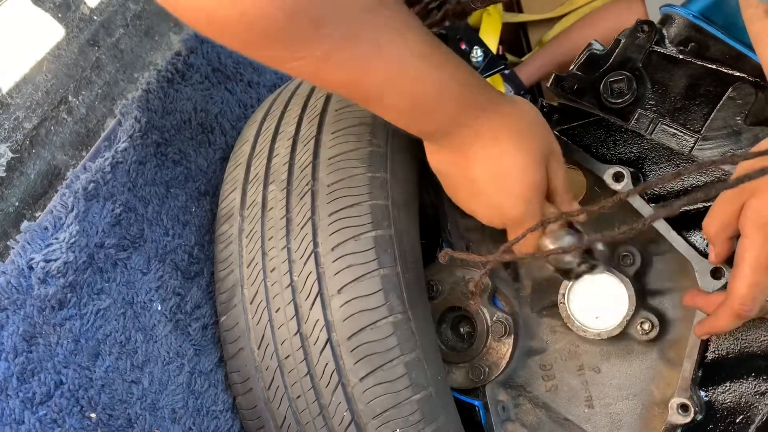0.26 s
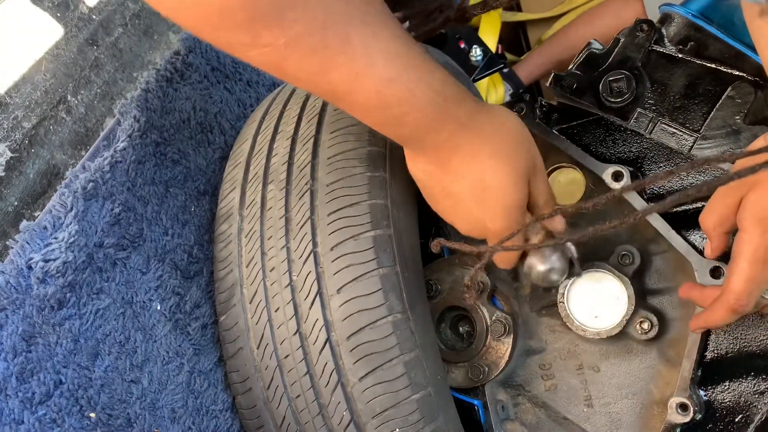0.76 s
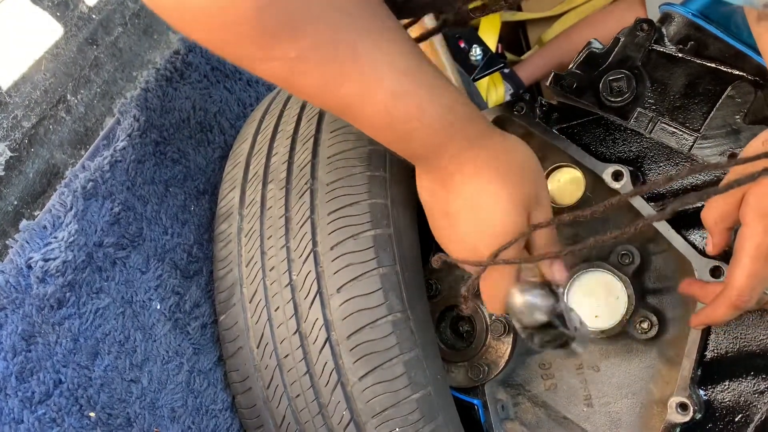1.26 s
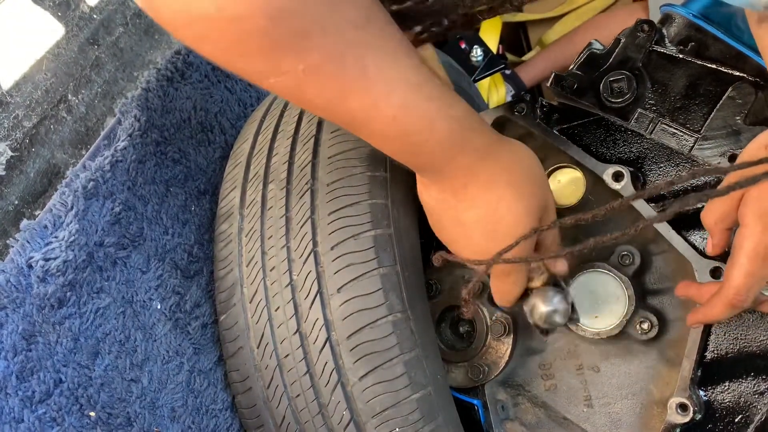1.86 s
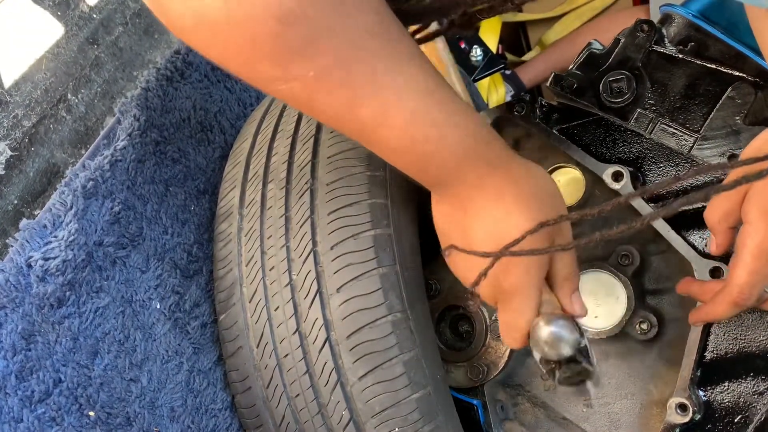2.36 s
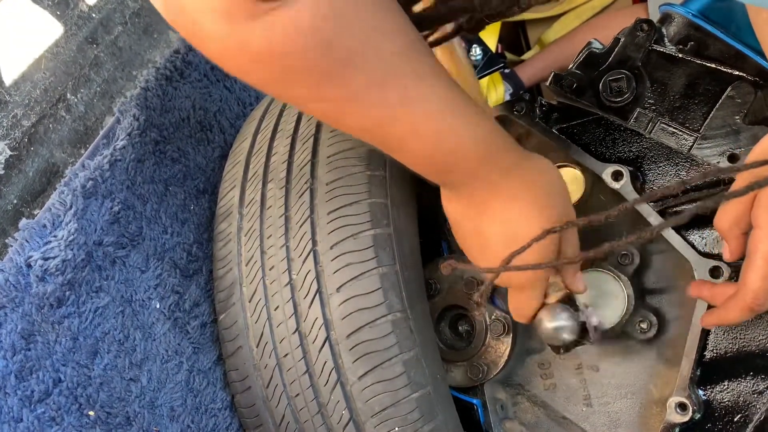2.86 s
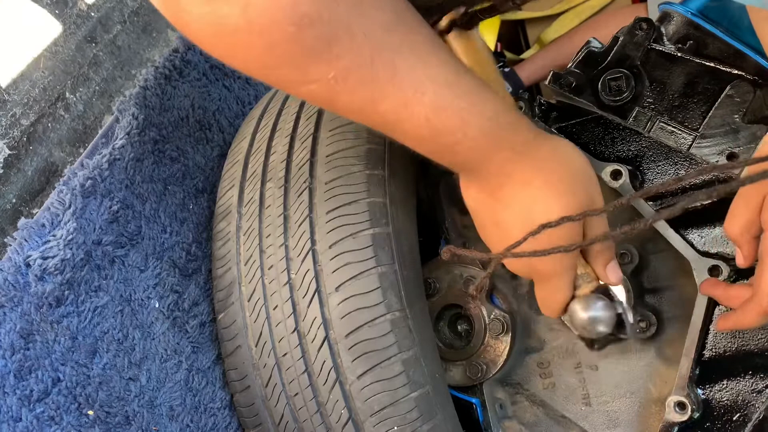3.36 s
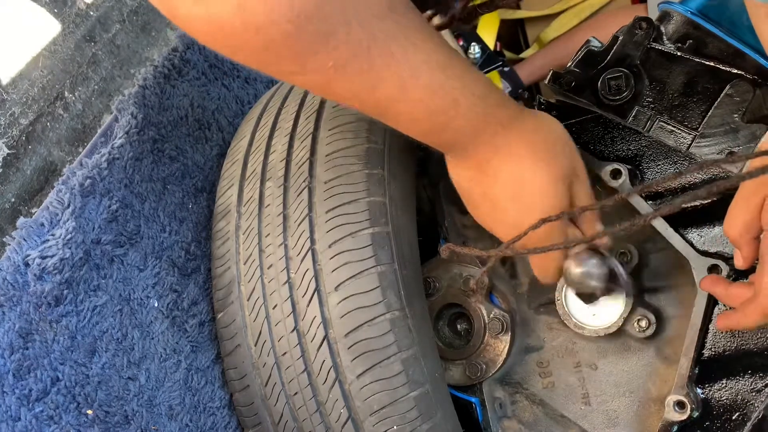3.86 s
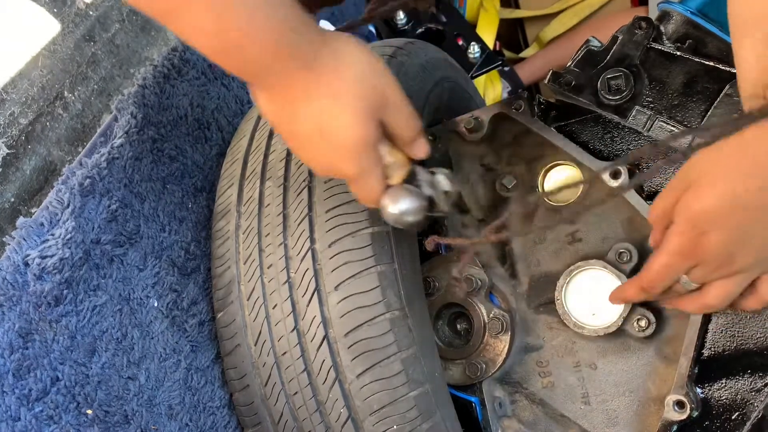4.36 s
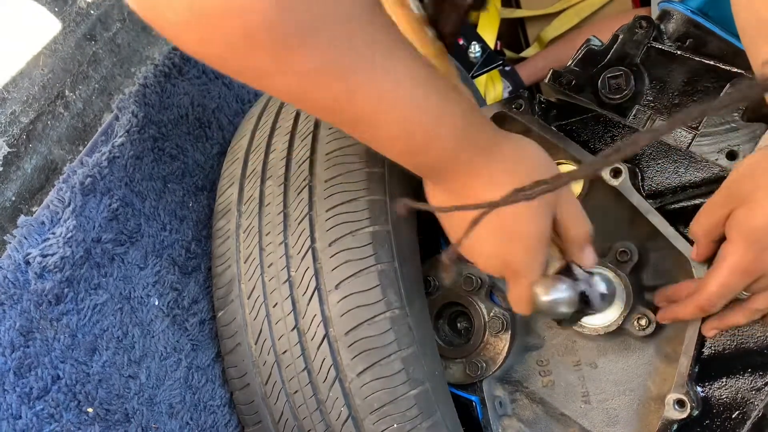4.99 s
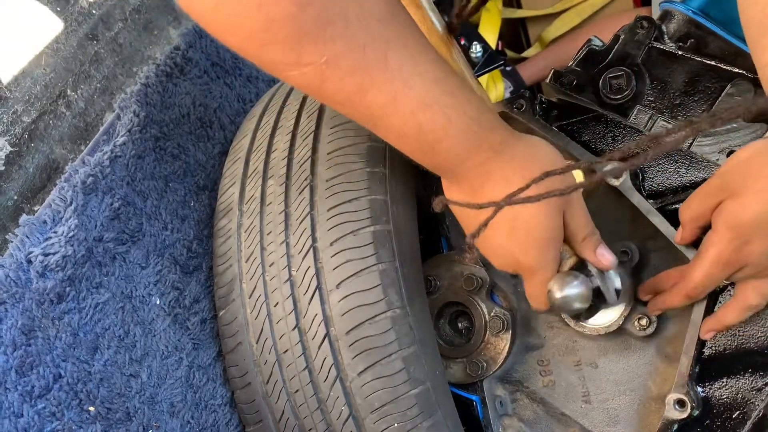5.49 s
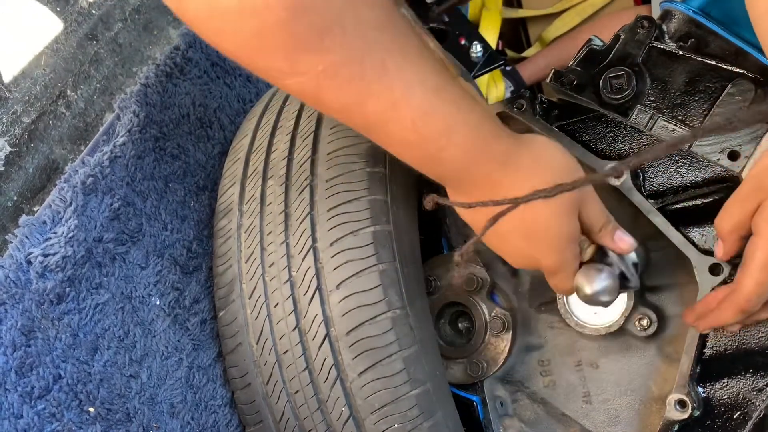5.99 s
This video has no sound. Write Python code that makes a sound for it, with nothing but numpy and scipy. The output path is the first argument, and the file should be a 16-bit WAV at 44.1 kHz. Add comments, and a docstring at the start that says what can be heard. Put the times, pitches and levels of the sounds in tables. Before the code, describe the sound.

Close outdoor sound of a small steel hammer driving a metal plug into a cast gearbox housing. Eleven loud, evenly spaced blows, nearly three a second, each a hard crack with a short, dull metallic clank and a slight ping. They stop before four seconds; after a gap come two very faint aiming taps, then one last hard blow. Low, quiet outdoor rumble and a faint yard tail.

```python
"""A small steel hammer taps a metal plug into a cast gearbox housing that rests against a tyre, outdoors.
A run of even blows, two light aiming taps and one last blow: damped modes make the plug's knock, the
housing's clank and the hammer head's ping; decaying bands of noise make the crack and the yard's faint tail.
Soft bumps, scuffs and ticks are heard besides the blows, over a low outdoor rumble of shaped noise.
Two microphone channels, alike in the bass and apart in the treble; a limiter holds down the peaks."""
import sys
import numpy as np
from scipy import signal
from scipy.fft import irfft
from scipy.io import wavfile
from scipy.ndimage import uniform_filter1d, minimum_filter1d

SR = 44100
rng = np.random.default_rng(int(sys.argv[2]) if len(sys.argv) > 2 else 0)


def to_wav(sig):
    """Store sig (one row per channel, or 1-D mono) as 16-bit WAV at the path in sys.argv[1].

    Samples outside -1..1 are clipped; the rate is SR.
    """
    pcm = np.clip(np.atleast_2d(sig), -1, 1) * 32767
    pcm = np.round(pcm).astype(np.int16)
    wavfile.write(sys.argv[1], SR, pcm.T)  # frames by channels


N = 274743  # length in samples
AGE = np.arange(SR) / SR  # time since a sound began, s

# Hammer blows: start_s, force_db, contact_brightness_db, top_head_ping_db
BLOWS = [(-0.2, 2, 0, 0), (0.1725, -0.7, 6, 4), (0.5478, 1.2, 2, -1), (0.9299, 0.3, 2.5, 1),
         (1.3091, -0.2, 0.5, 0), (1.684, 2.2, -4, 2), (2.0468, 3.5, -3.5, 2), (2.4085, 1.8, -1.5, 2),
         (2.7592, 1.6, -3.5, -3), (3.1166, -0.3, 3.3, 2), (3.4643, 0.2, 2.8, 8), (3.8122, 0, 3.5, 4),
         (5.0605, -24.5, -7, 4), (5.2389, -23, -19, -27), (5.7733, 0.2, -2.5, -14)]
# The plug's brief, heavily damped shudder as it is driven in: pitch_hz, level_db, length_s, channel_phase_rad
PLUG_SHUDDER = [(585, -6, .007, .55), (2130, -12, .007, 1.45), (5900, -19, .007, 1.4),
                (10300, -19, .003, 1.2)]
# Low modes of the wall around the plug: pitch_hz, level_db, t60_s, channel_phase_rad
WALL_MODES = [(143, -31, .13, .3), (210, -31, .07, .3), (291, -23, .06, .4), (520, -24, .04, .5),
              (668, -17, .065, .6), (960, -23, .055, 1.3), (1105, -26, .08, 1.5)]
# Damped modes of the housing near the plug: pitch_hz, level_db, t60_s, channel_phase_rad
HOUSING_MODES = [(1110, -27, .065, 1.2), (1420, -29, .1, 1.4), (1660, -31, .09, 1.4), (1755, -22, .05, 1.3),
                 (1897, -25, .09, 1.4), (2024, -14, .06, 1.3), (2110, -17, .055, 1.3),
                 (2175, -27, .17, 2.0), (2274, -14, .05, 1.35), (2450, -22, .045, 1.4),
                 (2600, -25, .05, 1.5), (3270, -26, .055, 1.3), (3460, -26, .055, 1.8),
                 (3640, -28, .045, 1.6), (4140, -33, .07, 1.8), (4850, -34, .06, 1.6),
                 (5540, -29, .035, 1.5), (6055, -23, .035, 1.3), (6390, -27, .035, 1.4)]
# Modes of the hammer head: pitch_hz, level_db, t60_s, channel_phase_rad
HEAD_MODES = [(7219, -34, .1, 1.7), (8680, -30, .07, 2.6), (10200, -29, .04, 1.4), (13150, -38, .1, 2.6),
              (13855, -28, .1, 2.55)]
# Crack of steel on steel: band_hz, level_db, t60_s
CRACK_BANDS = [(200, -37, 0.12), (500, -31.5, 0.01), (1300, -25, 0.028), (2100, -19, 0.021),
               (3300, -17.5, 0.032), (6000, -25, 0.015), (10800, -22, 0.042), (14500, -27, .016)]
# Crowd of small modes of the ribbed casting: band_hz, level_db, t60_s
CLANK_BANDS = [(198, -42, 0.31), (507, -31.5, 0.092), (1300, -35, 0.17), (2000, -25.5, .15),
               (3000, -30.5, 0.21), (5550, -30, .12), (9300, -40.5, 0.16), (15200, -54, 0.09)]
# Faint lasting modes of the whole casting: pitch_hz, level_db, t60_s, channel_phase_rad
LASTING_MODES = [(662, -53, .45, .6), (1087, -54, .45, 1.2), (1500, -51, .4, 1.5), (1583, -50, .45, 1.2),
                 (1739, -62, 1.6, 1.2), (1857, -44, .3, 1.3), (1965, -53, .7, 1.3), (2099, -43, .3, 1.4),
                 (2293, -53, .7, 1.5)]
# Sound scattered back by the yard: band_hz, level_db, t60_s
YARD_BANDS = [(200, -61.5, 0.55), (500, -57.5, 0.72), (1000, -63, 0.8), (1510, -56.5, 0.59),
              (1830, -48, 0.74), (2820, -56, 0.68), (5200, -51.5, 0.48), (7900, -68.5, 0.19),
              (15000, -80.5, 0.45)]
# Faint late echoes from further off: band_hz, level_db, t60_s
FAR_BANDS = [(500, -78, 0.62), (1400, -79.5, 1.9), (2000, -68.5, 0.85), (2840, -81, 1.9), (4800, -79, 4.8),
             (8000, -86.5, 0.71), (13000, -79, 5.7)]
# Soft low bumps of the housing shifting on the tyre: start_s, level_db, start_pitch_hz, length_s
BUMPS = [(1.937, -27, 195, 0.12), (2.35, -33, 225, 0.08), (5.9, -40, 60, 0.1)]
# Faint scuffs and ticks: the first two begin the bumps, the others stand alone: start_s, level_db, centre_hz
TICKS = [(1.938, -43.5, 414), (2.345, -52, 520), (4.54, -60, 550), (4.918, -57.5, 560), (5.992, -52, 950)]
# Spectrum of the outdoor rumble: frequency_hz, relative_density_db (per Hz)
AIR_SPECTRUM = [(20, -23.5), (35, -10.5), (55, -2), (95, -1.5), (160, -7.5), (250, -18), (330, -17.5),
                (500, -23.5), (1000, -32), (2000, -39), (4000, -55), (16000, -60)]
# Likeness of the two microphone channels: frequency_hz, correlation (-1 to 1)
LIKENESS = [(100, 0.9), (500, .8), (1200, 0.45), (3000, 0.12), (7000, -0.037), (14000, -0.73)]

# A harder blow seats the plug tighter: plug and housing sound higher, the head rings less freely.
FULL_PITCH, PITCH_PER_DB, PITCH_SCATTER = 1.008, 0.004, 0.016  # pitch factor
# Levels relative to the force of the blow (dB), and their change per dB of force
KNOCK_DB, KNOCK_PER_DB = -1.8, 0.12
PING_DB, PING_PER_DB = 2, -0.4  # the head's lowest mode
LASTING_DB, LASTING_PER_DB = -0.5, -0.25
ECHO_DB, ECHO_PER_DB = 0, -0.3  # treble of the yard and far echoes
PLUG_DB, CLANK_DB = -5.2, -1.3  # the plug's lowest shudder and the whole clank
# How far the treble of each part follows the brightness of the contact (dB per dB)
CRACK_FOLLOW, CLANK_FOLLOW, ECHO_FOLLOW = 0.45, 0.9, 1.0
# Time constants of build-up (s)
KNOCK_RISE_S, HOUSING_RISE_S, CRACK_RISE_S = 0.0013, 0.00056, 0.0006
CLANK_RISE_S, YARD_RISE_S, FAR_RISE_S = 0.0027, 0.015, 0.1
REBOUND_S, REBOUND_DB = 0.0035, -5.5
GROUND_DELAY_S, GROUND_DB = 0.012, -18.5  # a path about 4 m longer than the direct one
BALANCE_DB = -0.6  # hammer, left minus right
SETTLE_HZ, BUMP_RISE_S = 60, 0.0086  # the pitch every bump settles to; its build-up time constant
SINK_SHARE, BUMP_RING = 0.33, 2.4  # sinking time constant and t60, in lengths of the bump
AIR_DB, AIR_DRIFT_DB = -58, 0.56  # middle level; rms of the slow drift
LIMIT, EDGE_HZ = 0.93, 16200  # limiter ceiling (full scale 1); upper band limit


def hammer(ripple_db=3.5):
    """All the blows fall on one casting from one place, so the small modes bunch alike at each."""
    out = np.zeros((2, N))
    ribs_db = ripple_db * bunching(size=70)
    for start_s, force_db, bright_db, ping_db in BLOWS:
        add(out, start_s, blow(force_db, bright_db, ping_db, ribs_db))
    return out * amp(BALANCE_DB * np.array([[.5], [-.5]]))


def blow(force_db, bright_db, ping_db, ribs_db, wander_db=4.5):
    """One blow drives the plug, the housing and the head; the yard answers a moment later."""
    tune = FULL_PITCH + PITCH_PER_DB * force_db + PITCH_SCATTER * rng.standard_normal()
    echo_db = ECHO_DB + ECHO_PER_DB * force_db + ECHO_FOLLOW * bright_db
    # each point of contact favours other modes
    ripple = amp(ribs_db + wander_db * bunching(size=300))
    close = plug(force_db, bright_db, tune) + knock(force_db) + housing(bright_db, tune)
    close = close + head(force_db, ping_db) + crack(bright_db, ripple)
    direct = reflect(close, GROUND_DELAY_S, GROUND_DB)
    casting = lasting(force_db) + clank(bright_db, ripple)
    echoes = yard(echo_db, ribs_db) + far(echo_db)
    return amp(force_db) * (direct + casting + echoes)


def plug(force_db, bright_db, tune, slip=0.51):
    """A few cycles that swell and stop while the plug slips in its seat."""
    lowest_db = PLUG_DB + KNOCK_PER_DB * force_db
    extra_db = [lowest_db, 0, .5 * bright_db, bright_db]
    wobbles = rng.standard_normal(len(PLUG_SHUDDER))
    out = 0
    for (hz, db, length, spread), extra, wobble in zip(PLUG_SHUDDER, extra_db, wobbles):
        window = np.sin(np.pi * np.minimum(AGE / length, 1)) ** 2
        phase = mode_phase(hz * tune, slip * wobble, spread)
        out = out + amp(db + extra) * window * np.sin(phase)
    return out


def knock(force_db):
    """The wall around the plug rings briefly in its low modes."""
    level_db = KNOCK_DB + KNOCK_PER_DB * force_db
    return ring(WALL_MODES, level_db, 1, scatter_db=2.17, slip=0.36) * swell(KNOCK_RISE_S) ** 2


def housing(bright_db, tune):
    """Damped modes of the housing near the plug; a bright contact lifts the upper ones."""
    mode_db = bright_db * treble(np.array(HOUSING_MODES)[:, 0])
    return ring(HOUSING_MODES, mode_db, tune, scatter_db=1.5, slip=0.93) * swell(HOUSING_RISE_S)


def head(force_db, ping_db):
    """The hammer head pings; force sets its lowest mode, the blow's own ping level its top one."""
    mode_db = np.linspace(PING_DB + PING_PER_DB * force_db, ping_db, len(HEAD_MODES))
    return ring(HEAD_MODES, mode_db, 1, scatter_db=0.4, slip=np.pi)


def crack(bright_db, ripple):
    """Steel cracks on steel, and again as the plug springs back against the hammer face."""
    first = dense(CRACK_BANDS, CRACK_FOLLOW * bright_db, ripple) * swell(CRACK_RISE_S)
    return reflect(first, REBOUND_S, REBOUND_DB)


def clank(bright_db, ripple):
    """The many small modes of the ribbed casting build up together and die away as a clank."""
    body = dense(CLANK_BANDS, CLANK_FOLLOW * bright_db, np.sqrt(ripple))
    return amp(CLANK_DB) * body * swell(CLANK_RISE_S)


def lasting(force_db):
    """The whole casting keeps ringing faintly in its least damped modes."""
    level_db = LASTING_DB + LASTING_PER_DB * force_db
    return ring(LASTING_MODES, level_db, tune=0.98, scatter_db=3.0, slip=np.pi)


def yard(echo_db, ribs_db):
    """The yard scatters the blow back as a tail that builds over some milliseconds."""
    return dense(YARD_BANDS, echo_db, amp(.5 * ribs_db)) * swell(YARD_RISE_S)


def far(echo_db):
    """Late echoes from further off build slowly and are brought to silence within a second."""
    return dense(FAR_BANDS, echo_db, 1) * swell(FAR_RISE_S) * (1 - AGE ** 4)


def rocking(slow_hz=55, slow_db=-49, quick_hz=95, quick_db=-53):
    """Each blow sets the heavy housing rocking on the tyre, in proportion to its force."""
    out = np.zeros((2, N))
    envelope = fade(.9) * swell(.02)
    for start_s, force_db, *_ in BLOWS:
        slow = amp(slow_db) * np.sin(2 * np.pi * slow_hz * AGE)
        quick = amp(quick_db) * np.sin(2 * np.pi * (quick_hz * AGE + rng.random()))
        add(out, start_s, (amp(force_db) * (slow + quick) * envelope)[None])
    return out


def handling():
    """Dull bumps, the first two begun by a scuff, and a few tiny ticks."""
    out = np.zeros((2, N))
    for start_s, db, start_hz, length in BUMPS:
        add(out, start_s, amp(db) * bump(start_hz, length))
    for start_s, db, centre in TICKS:
        add(out, start_s, amp(db) * scuff_or_tick(centre))
    return out


def bump(start_hz, length, unevenness=0.52):
    """The housing shifts on the tyre: a juddering low tone whose pitch moves to its settling pitch."""
    hz = SETTLE_HZ + (start_hz - SETTLE_HZ) * np.exp(-AGE / (SINK_SHARE * length))
    slow_noise = uniform_filter1d(rng.standard_normal(len(AGE)), size=250)
    judder = 1 + unevenness * unit(uniform_filter1d(slow_noise, size=150))
    tone = np.sin(2 * np.pi * np.cumsum(hz) / SR)
    return (judder * tone * swell(BUMP_RISE_S) * fade(BUMP_RING * length))[None]


def scuff_or_tick(centre):
    """A short burst of noise in one band."""
    hz, spectra = noise_pair(len(AGE))
    band = 1 / (1 + (1.6 * np.log2((hz + 1) / centre)) ** 4)
    return unit(irfft(spectra * band, len(AGE))) * swell(.003) * fade(.08)


def air():
    """Low outdoor rumble: shaped noise that drifts slowly in level."""
    hz, spectra = noise_pair(N)
    t = np.arange(N) / SR
    drift = 0
    for drift_hz in np.geomspace(.3, 5, 12):
        drift = drift + np.sin(2 * np.pi * (drift_hz * t + rng.random())) / np.sqrt(drift_hz)
    rumble = unit(irfft(spectra * amp(read(AIR_SPECTRUM, hz)), N))
    return amp(AIR_DB + AIR_DRIFT_DB * unit(drift)) * rumble


def ring(modes, mode_db, tune, scatter_db, slip):
    """Damped modes; the point of contact shifts their strength and phase."""
    extras = mode_db + np.zeros(len(modes))
    draws = rng.standard_normal((len(modes), 2))
    out = 0
    for (hz, db, t60, spread), extra, (strength, shift) in zip(modes, extras, draws):
        phase = mode_phase(hz * tune, slip * shift, spread)
        out = out + amp(db + extra + scatter_db * strength) * fade(t60) * np.sin(phase)
    return out


def mode_phase(hz, shift, spread):
    """Running phase of one mode (rad), spread apart between the two channels."""
    return 2 * np.pi * hz * AGE + shift + np.array([[-.5], [.5]]) * spread


def dense(bands, bright_db, ripple):
    """Countless overlapping modes as noise: each band dies at its own speed."""
    hz, spectra = noise_pair(len(AGE))
    spectra = spectra * ripple * hz ** 2 / (hz ** 2 + 80 ** 2)  # less deep bass
    centres = [row[0] for row in bands]
    out = 0
    for own, (centre, db, t60) in zip(np.eye(len(bands)), bands):
        # full at its own centre, nothing at its neighbours'
        mask = read(list(zip(centres, own)), hz)
        band = unit(irfft(spectra * mask, len(AGE)))
        out = out + band * amp(db + bright_db * treble(centre)) * fade(t60)
    return out


def bunching(size):
    """A random profile over frequency with rms 1, smooth over size Hz."""
    return unit(uniform_filter1d(rng.standard_normal(len(AGE) // 2 + 1), size=size))


def treble(hz):
    """How much a shorter, harder contact lifts this frequency, 0-1."""
    return np.clip(np.log2(hz / 2100), 0, 1)


def noise_pair(size):
    """Random spectra for two channels, alike in the bass, unrelated then opposed higher up."""
    hz = np.fft.rfftfreq(size, 1 / SR)
    mid, side = rng.standard_normal((2, len(hz))) + 1j * rng.standard_normal((2, len(hz)))
    same = np.clip(read(LIKENESS, hz), -1, 1)
    mid, side = mid * np.sqrt(1 + same), side * np.sqrt(1 - same)
    return hz, np.array([mid + side, mid - side])


def reflect(x, delay, db):
    """Adds one copy at another level and a later time: an echo or a rebound."""
    later = np.pad(x, ((0, 0), (round(delay * SR), 0)))[:, :x.shape[1]]
    return x + amp(db) * later


def fade(t60):
    """Free decay, 60 dB in t60 seconds."""
    return np.exp(-np.log(1000) * AGE / t60)


def swell(rise):
    """Build-up of a vibration with time constant rise (s)."""
    return 1 - np.exp(-AGE / rise)


def amp(db):
    """Decibels to gain."""
    return 10 ** (np.asarray(db) / 20)


def unit(x):
    """Scales to rms 1."""
    return x / np.sqrt(np.mean(x ** 2) + 1e-20)


def read(points, hz):
    """Reads a table along log frequency."""
    f, value = np.transpose(points)
    return np.interp(np.log(hz + 1), np.log(f), value)


def add(mix, start_s, sound):
    """Lays a sound into the mix; one begun before the start is already dying away."""
    start = round(start_s * SR)
    sound = sound[:, max(-start, 0):]
    part = mix[:, max(start, 0):][:, :sound.shape[1]]
    part += sound[:, :part.shape[1]]


def scene():
    """All sources at the microphone."""
    return hammer() + rocking() + handling() + air()


def record(dry):
    """A fast limiter, linked across both channels, holds down the peaks; then the upper band limit."""
    need = np.minimum(1, LIMIT / (abs(dry).max(0) + 1e-9))
    gain = uniform_filter1d(minimum_filter1d(need, size=21), size=21)
    lowpass = signal.firwin(255, EDGE_HZ, window=("kaiser", 9), fs=SR)
    return signal.oaconvolve(dry * gain, lowpass[None], "same")


dry = scene()
out = record(dry)
to_wav(out)
```